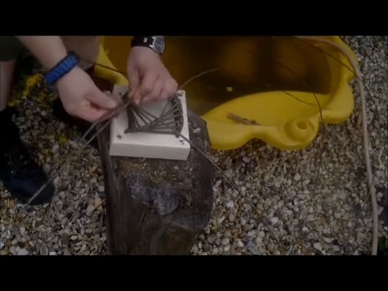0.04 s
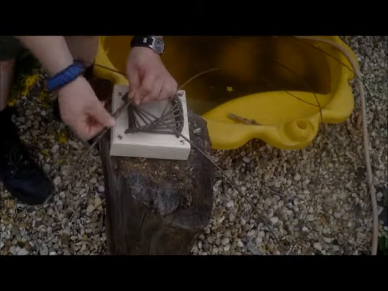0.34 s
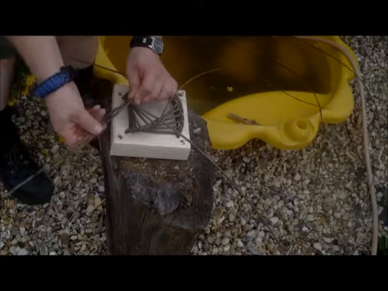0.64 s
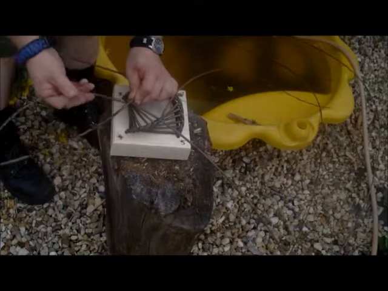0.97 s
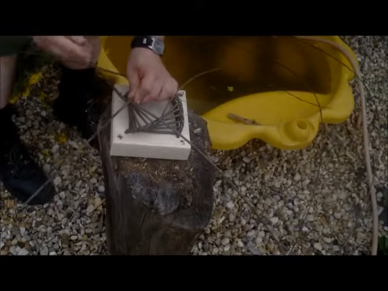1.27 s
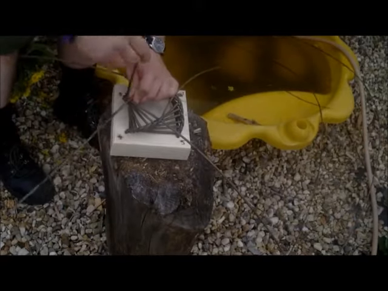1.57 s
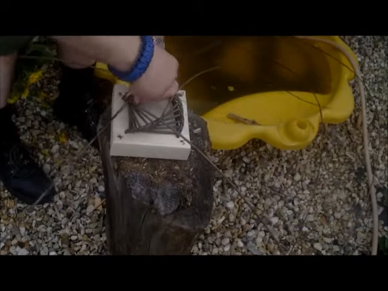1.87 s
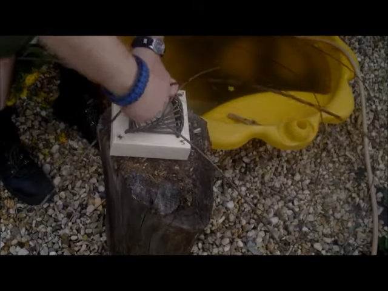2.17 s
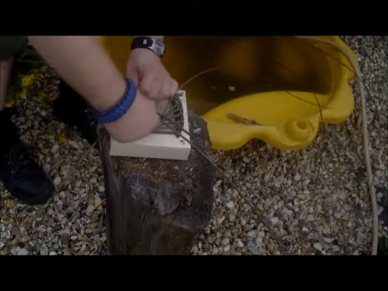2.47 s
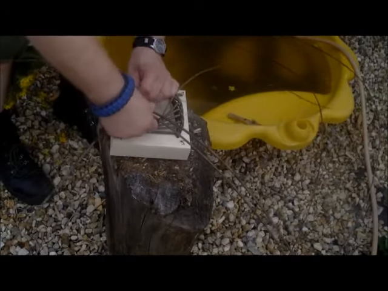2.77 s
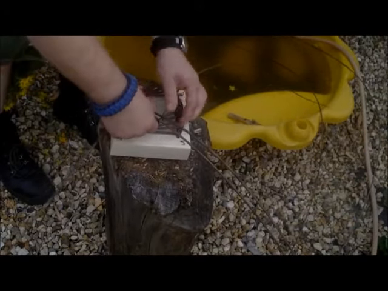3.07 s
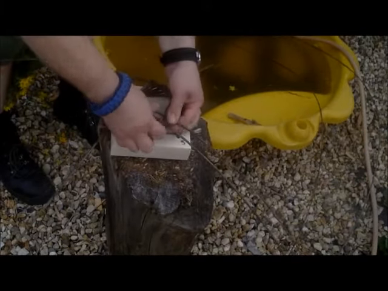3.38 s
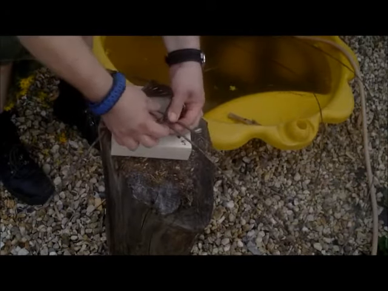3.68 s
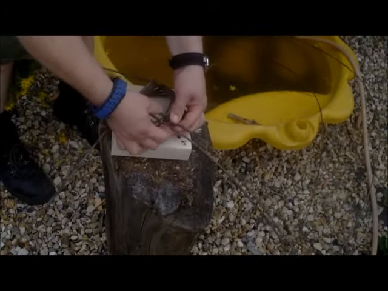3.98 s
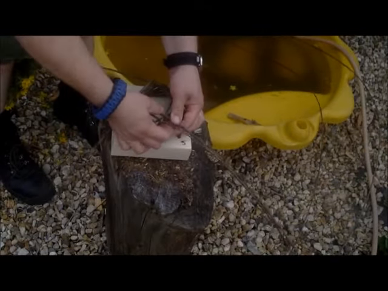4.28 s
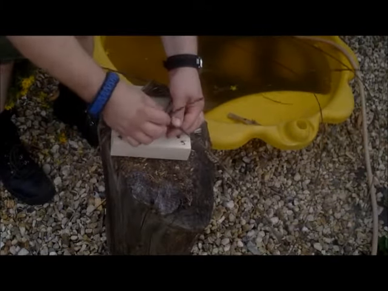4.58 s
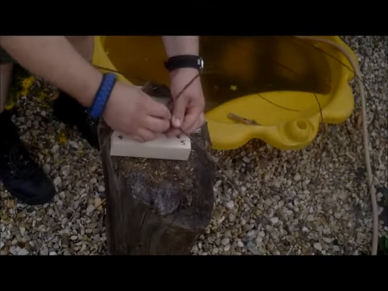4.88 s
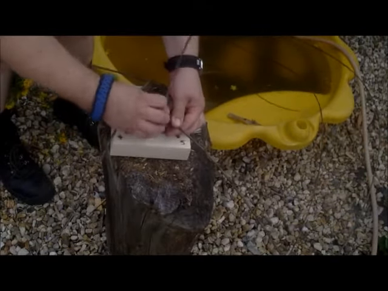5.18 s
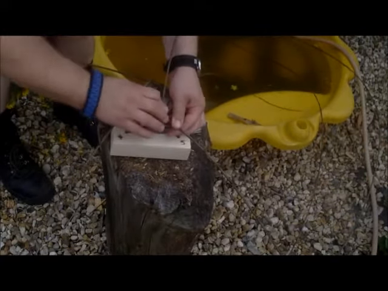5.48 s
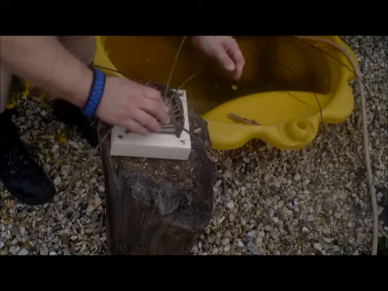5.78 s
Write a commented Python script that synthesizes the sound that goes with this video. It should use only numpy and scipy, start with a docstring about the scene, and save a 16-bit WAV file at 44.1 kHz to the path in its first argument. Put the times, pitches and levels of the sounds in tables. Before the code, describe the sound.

Soaked willow rods are woven outdoors, close by, their free ends whipping a hollow plastic tub. Each slap rings briefly, with a tight echo from a wall. A first slap lands at 0.2 seconds, then a busy run from 0.6 to 1.6 seconds, mixed with short, gritty scrapes along the rim. A quick burst of sharp rod-tip ticks peaks near 1.75 seconds. More slaps come between 2.5 and 3.1 seconds, followed by a lull. From 4.1 to 4.7 seconds there is a last flurry with a scrape and bright cracks, and one faint tick follows at 5.3 seconds. Throughout, a deep rumble swells and sinks under distant traffic and light hiss. Faint, thin road whines rise around 1.5 and 3.6 seconds, and a low engine drone wavers, strongest near 4.7 seconds.

```python
"""Outdoors, near a wall, soaked willow rods are woven on a wooden block. Their long free ends whip
against a plastic soaking tub, which rings, and the wall echoes each slap. The rods also drag along
the tub's rim, sticking and slipping. Their tips tick sharply, some at the start of a slap, some alone.
Behind them are a low rumble, a distant road with faint whines, and the drone of an engine."""
import sys
import numpy as np
from scipy import signal
from scipy.fft import rfft, irfft, next_fast_len
from scipy.io import wavfile
from scipy.ndimage import uniform_filter1d, map_coordinates

SR = 44100
rng = np.random.default_rng(int(sys.argv[2]) if len(sys.argv) > 2 else 0)


def bounce(signal):
    """Save signal as a 16-bit WAV file at the path given by the first command-line argument."""
    frames = np.transpose(np.atleast_2d(signal))
    limited = np.clip(frames, -1, 1)
    pcm = np.round(limited * 32767).astype(np.int16)
    wavfile.write(sys.argv[1], SR, pcm)


N = 266584

# Rod ends slapping the tub; the spot that is hit favours one note. Each row: start in seconds, level
# in dB, extra thud in dB, brightness in dB, note in Hz, the note's dB above the level.
TUB_SLAPS = [(0.218, -35, -3.5, 5, 3290, 0.5), (0.557, -49.5, -7, -12, 2300, -4),
             (0.673, -46, 9.5, 2, 410, 3), (0.785, -29.5, -1.5, 0, 2400, 3.5),
             (0.887, -36, 0.5, 2, 2336, 5.5), (0.9742, -41.5, 9, -2, 410, -7),
             (1.150, -29.5, 2.5, 6, 880, 1.5), (1.22, -40.5, -15, 12, 727, 11),
             (1.317, -38, -22, -7, 690, -4), (1.387, -45, -21, 4, 1300, -6), (1.616, -32, 3, 3.5, 370, 5.5),
             (1.886, -50, -15, -6, 2300, -10), (2.464, -29, 2.5, 8.5, 5020, -12),
             (2.6036, -28.5, 1, -1, 1255, 1.5), (2.738, -45.5, 7.5, -7, 1650, 3),
             (2.799, -33, 1, 5.5, 3386, -6), (2.953, -40, 3.5, -17, 1830, 5),
             (3.055, -38, -1, -6, 3420, -7), (4.102, -35, 4, -7, 160, 1), (4.189, -38.5, 1, -2, 222, 2),
             (4.4304, -30.5, 1, 16, 4900, -9), (4.449, -33, 0, 20, 3976, 9.5),
             (4.538, -26.5, 0.5, 7.5, 5890, -17), (4.6275, -32.5, -0.5, 1, 1295, 4)]


def amp(db):
    """Turn decibels into a gain; amp(-60 * t / ring_s) fades by 60 dB in ring_s seconds."""
    return 10 ** (np.asarray(db) / 20)


def unit(x):
    """Scale a signal to an average (rms) level of 1."""
    return x / np.sqrt(np.mean(x ** 2) + 1e-20)


def pan(lean_db):
    """Left and right gains that make the left louder by lean_db."""
    return amp([[lean_db / 2], [-lean_db / 2]])


def curves(rows):
    """Join timed points with straight lines: one curve for each column after the time."""
    times, *columns = np.transpose(rows)
    return [np.interp(np.arange(N) / SR, times, column) for column in columns]


def wobble(rate):
    """A smooth curve through `rate` random points a second."""
    points = rng.standard_normal(int(N * rate / SR) + 4)
    return map_coordinates(points, [np.arange(N) * rate / SR])


def filtered(x, response):
    """Multiply each frequency in x by response(hz)."""
    size = next_fast_len(N + SR // 2)
    return irfft(rfft(x, size) * response(np.fft.rfftfreq(size, 1 / SR)), size)[..., :N]


def stereo_noise(size, side_db):
    """White noise; the lower side_db is, the more alike left and right are."""
    mid, side = rng.standard_normal((2, size))
    return unit(mid + amp(side_db) * np.array([side, -side]))


def rush(spectrum, side_db, patchy_db=0):
    """Stereo noise shaped to a spectrum; patchy_db adds drifting louder and softer patches."""
    points_hz, db = np.transpose(spectrum)
    frames = signal.stft(stereo_noise(N, side_db), nperseg=2048)[2]
    patches = uniform_filter1d(rng.standard_normal(frames.shape[1:]), size=3, axis=0)
    patches = unit(uniform_filter1d(patches, size=12, axis=1))
    noise = signal.istft(frames * amp(patchy_db * patches), nperseg=2048)[1][:, :N]
    return unit(filtered(noise, lambda hz: amp(np.interp(np.log(hz + 1), np.log(points_hz), db))))


def split_bands(x):
    """Split a sound into thud, clack, snap and fizz; the thud leans left, the rest slightly right."""
    # The four bands. Each row: lower edge in Hz, upper edge in Hz.
    edges = [(200, 620), (620, 2900), (2900, 6900), (8500, 14800)]
    # Each band's left level minus its right level, in dB.
    leans = [14, -1.5, -1, -.3]
    filters = [signal.butter(3, band, "bandpass", fs=SR, output="sos") for band in edges]
    return [signal.sosfilt(sos, x) * pan(lean) for sos, lean in zip(filters, leans)]


def colour(thud_db, bright_db):
    """Extra dB for each band: a heavy contact adds thud, a hard one snap and fizz."""
    return np.array([thud_db, 0, 0.51 * bright_db, bright_db])


def mix_bands(bands, levels_db, size):
    """Mix bands so that the first `size` samples of each have the given level."""
    return sum(amp(db) * band / np.sqrt(np.mean(band[:, :size] ** 2) + 1e-20)
               for band, db in zip(bands, levels_db))


def ringing(modes, t, scatter_db, spread):
    """A struck object's fading tones (modes): random in strength, a bit out of step left and right."""
    hz, db, ring_s = np.transpose(modes)[:, :, None]
    strength, phase, skew = rng.standard_normal((3, len(modes), 1))
    stereo_shift = spread * skew * np.array([1, -1])[:, None, None]
    waves = np.sin(2 * np.pi * (hz * t + phase) + stereo_shift)
    return np.sum(amp(db + scatter_db * strength - 60 * t / ring_s) * waves, axis=1)


def add(track, start_s, sound):
    """Lay a sound into a track at start_s seconds."""
    start = max(round(start_s * SR), 0)
    track[:, start:start + sound.shape[1]] += sound[:, :N - start]


def rumble():
    """A deep throb and low noise swell and sink together over a steady, dull murmur."""
    # The tone of the low noise and of the murmur. Each row: frequency in Hz, relative level in dB.
    low_spectrum = [(12, -3.5), (20, -8), (26, 4.5), (38, -11.5), (55, -6.5), (80, -23), (160, -34.5),
                    (300, -80)]
    murmur_spectrum = [(20, -18.5), (45, 2), (75, -4.5), (110, -13), (150, -14), (215, -12), (300, -16.5),
                       (420, -22), (700, -32.5), (2000, -72)]
    # The swells. Each row: time in seconds, level in dB.
    swells = [(0, -26.5), (0.15, -29.5), (0.52, -23.5), (1.05, -28), (1.2, -25.5), (1.6, -32.5),
              (2.4, -44.5), (2.58, -29.5), (2.82, -27), (3.0, -43.5), (4.15, -44), (4.33, -31.5),
              (5.3, -42), (6.04, -36)]
    throb_hz = 24.2 * (1 + 0.0344 * wobble(4.6))
    throb = np.sin(2 * np.pi * np.cumsum(throb_hz) / SR)
    deep = amp(curves(swells)[0]) * (1.07 * throb + 0.66 * rush(low_spectrum, side_db=-20))
    murmur = amp(-40) * rush(murmur_spectrum, side_db=-12.5)
    return (deep + murmur) * pan(-1.4)


def road():
    """Distant traffic blends into a rush that slowly swells and sinks."""
    # The traffic's tone. Each row: frequency in Hz, relative level in dB.
    spectrum = [(110, -1.5), (180, -1), (317, -5.5), (353, 0.5), (444, -3), (487, -2), (534, -2.5),
                (783, -5), (1200, -4.5), (2840, -18.5), (5740, -26), (7000, -41), (9100, -78),
                (15400, -120)]
    # Its swells. Each row: time in seconds, level in dB.
    swells = [(0, -43), (0.55, -47.5), (1.1, -40.5), (2.2, -48), (4.25, -39), (5.4, -41), (6.04, -39)]
    gain = amp(curves(swells)[0] + 0.24 * wobble(7))
    return gain * rush(spectrum, side_db=-16.5, patchy_db=2.4) * pan(-1)


def whines():
    """Thin, wavering tones rise out of the traffic and fade again."""
    # Each row: start and end in seconds, first and last pitch in Hz, peak level in dB.
    glides = [(1.15, 1.867, 673, 646.5, -48), (1.28, 1.608, 610, 595, -46.5), (3.45, 3.71, 497, 492, -43.5),
              (3.58, 3.926, 810, 824, -47.5)]
    out = np.zeros((2, N))
    for start, end, from_hz, to_hz, db in glides:
        progress = np.linspace(0, 1, round((end - start) * SR))
        hz = (from_hz + (to_hz - from_hz) * progress) * (1 + 0.0045 * wobble(22)[:len(progress)])
        tone = amp(db) * np.sin(np.pi * progress) * np.sin(2 * np.pi * np.cumsum(hz) / SR)
        add(out, start, tone[None])
    return out


def engine():
    """An engine drones on two low notes, each wavering in pitch and loudness."""
    # How loud each note is. Each row: time in seconds, level in dB.
    upper_levels = [(0, -55), (0.3, -41), (2.0, -38.5), (2.75, -34.5), (3.3, -38.5), (3.7, -34.5),
                    (4.6, -42.5), (4.9, -44), (6.04, -45)]
    lower_levels = [(0, -48), (1.1, -38.5), (1.9, -67), (3.5, -59), (4.1, -33.5), (4.4, -35.5),
                    (4.72, -24.5), (5.3, -47), (6.04, -44)]
    # Their pitches. Each row: time in seconds, upper note in Hz, lower note in Hz.
    pitches = [(0, 112, 78), (2.5, 107, 76.46), (4.3, 104, 74.3), (4.601, 105, 77.1), (5.0, 110, 72.1),
               (6.04, 116, 71.6)]
    drone = 0
    for db, hz in zip(curves(upper_levels) + curves(lower_levels), curves(pitches)):
        cycles = np.cumsum(hz * (1 + 0.0088 * wobble(9))) / SR
        drone += amp(db + 1.3 * wobble(8)) * np.sin(2 * np.pi * cycles)
    return drone * pan(-1.4)


def rim_drags():
    """Wet bark sticks and slips along the tub's rim; the tiny, uneven jerks make the rim ring."""
    # Strokes of a rod. Each row: peak time, rise and fall in seconds, then level, extra thud and
    # brightness in dB.
    strokes = [(0.736, 0.046, 0.079, -41, 0.5, 4), (0.93, .02, 0.15, -36, -1, -1),
               (0.996, .015, 0.083, -43, -4, 16), (1.108, 0.038, 0.087, -37.5, 10.5, -3),
               (1.16, 0.06, 0.083, -26, -4.5, 3), (1.315, .01, 0.087, -40.5, -16, 14.5),
               (4.318, .015, 0.095, -45, -14, 14.5), (4.368, .07, 0.059, -36, -5.5, -4)]
    # The rim's resonances. Each row: frequency in Hz, width in Hz, relative level in dB.
    resonances = [(407, 15.4, 13.5), (698, 63, -4), (830, 60, -15), (1060, 25, -5), (1378, 54, -5.5),
                  (1965, 57, -6), (2255, 67, -6.5), (2460, 70, -12), (3210, 310, -11.5), (4300, 170, -9.5),
                  (5050, 350, -14), (6330, 400, -21)]
    # Thud, clack, snap and fizz of an ordinary stroke, in relative dB.
    balance_db = [1, -1, -9.5, -19]

    def rim(f):
        """How strongly the rim answers at each frequency."""
        return 0.018 + sum((-1) ** k * amp(db) * 1j * f * width / (hz * hz - f * f + 1j * f * width)
                           for k, (hz, width, db) in enumerate(resonances))

    slips_per_s, slip_s, fade_db = 750, 0.00074, 20
    out, t = np.zeros((2, N)), np.arange(N) / SR
    slips = (rng.random(N) < slips_per_s / SR) * amp(2.5 * rng.standard_normal(N))
    grains = unit(signal.lfilter([1], [1, -np.exp(-1 / (slip_s * SR))], slips))
    scrape = filtered(stereo_noise(N, side_db=-11) * (grains + .5), rim)
    bands = [unit(band) for band in split_bands(scrape)]
    for peak, rise, fall, db, thud_db, bright_db in strokes:
        pressure = amp(db - fade_db * np.maximum((peak - t) / rise, (t - peak) / fall))
        out += pressure * np.tensordot(amp(colour(thud_db, bright_db) + balance_db), bands, 1)
    return out


def rod_ticks():
    """Sharp rod-tip ticks: some start a slap on the tub, others tap alone close by."""
    # A harder contact has a higher pitch. Each row: start in seconds, level in dB, pitch in Hz, base
    # fade time in seconds.
    contacts = [(0.218, -32.5, 6100, 0.015), (0.7878, -28, 1910, .016), (0.886, -30.5, 1640, .016),
                (1.1495, -35, 3560, 0.0083), (1.318, -32.5, 9800, 0.011), (1.390, -40.5, 4500, .019),
                (1.612, -23, 6240, .01), (1.668, -44, 6900, .006), (1.695, -40, 2360, .012),
                (1.701, -28.5, 1500, 0.031), (1.7375, -30, 4930, 0.0055), (1.751, -24.5, 2340, 0.012),
                (1.7686, -19.5, 2190, .014), (1.7724, -26, 1360, 0.014), (2.136, -46, 2180, 0.029),
                (2.4447, -42, 1170, 0.04), (2.601, -32, 1330, 0.018), (3.954, -44.5, 4660, 0.012),
                (4.318, -46, 9600, .012), (5.260, -50, 6850, .022)]
    # A thin rod's modes. Each row: frequency in Hz, relative level in dB, multiple of the fade time.
    rod_modes = [(1450, -8, 1), (2020, 0, 1.6), (2490, -1.5, 3.3), (4020, 3.5, 1.7), (5030, 11, 0.4),
                 (5960, 4, 0.82), (6900, -22, 0.59), (10740, 3, 0.47), (11800, 5, 0.45)]
    out, t = np.zeros((2, N)), np.arange(SR // 10) / SR
    centres_hz = np.array([1500, 4500, 11200])  # clack, snap and fizz; a tick has no thud
    note_db, octave_loss_db = 5, 3.5
    for start, db, hz, fade_s in contacts:
        modes = [(f, level, times * fade_s) for f, level, times in rod_modes + [(hz, note_db, 1.4)]]
        spike = amp(-60 * t / (.5 * fade_s))
        tail = amp(-17.5 - 60 * t / 0.12)
        noise = stereo_noise(len(t), side_db=-5) * (spike + tail)
        tick = noise + .3 * ringing(modes, t, scatter_db=1, spread=.25)
        levels_db = db - octave_loss_db * np.log2(centres_hz / hz) ** 2  # strongest near its pitch
        add(out, start, mix_bands(split_bands(tick)[1:], levels_db, size=128))
    return out


def tub_notes():
    """Each slap leaves one note ringing, high ones longest; the rod touching the tub makes it flutter."""
    out, t = np.zeros((2, N)), np.arange(SR // 2) / SR
    attack = 1 - np.exp(-t / 0.00081)
    for start, db, _, _, hz, note_db in TUB_SLAPS:
        ring_s = .1 + .012 * (hz / 1000) ** 2
        flutter = np.interp(t, np.linspace(0, .5, 120), rng.normal(1, .25, size=120))
        note = ringing([(hz, db + note_db, ring_s)], t, scatter_db=1, spread=0.15)
        lean_db = np.interp(hz, [230, 380, 700], [6, 13.5, -3])
        add(out, start, note * flutter * attack * pan(lean_db))
    return out


def tub_slaps():
    """A rod cracks on the tub, chatters and sets it ringing; the wall sends back a smeared crack."""
    # The hollow tub's modes. Each row: frequency in Hz, relative level in dB, seconds to fade by 60 dB.
    tub_modes = [(161.7, -4, 0.33), (230, 0, 0.28), (370.4, 1.5, 0.27), (413.8, 5, 0.21), (681, -15, .17),
                 (844, -6, 0.064), (1242, 0.5, 0.1), (1313, 8, 0.03), (1654, 1.5, 0.062),
                 (1836, -8.5, 0.17), (1980, -15, 0.11), (2190, -1.5, 0.047), (2290, -9.5, 0.35),
                 (2424, 2, 0.067), (2640, -13, 0.32), (3246, -6, 0.29), (3720, -1.5, 0.26), (3790, -5, 0.2),
                 (3940, -3.5, 0.34), (4490, 2, 0.18), (4750, 0, 0.19), (4800, -0.5, 0.25), (5000, -5, 0.44),
                 (5560, -15, 0.31), (5867, -6.5, 0.28), (6200, -23, 0.16), (6950, -33, 0.23)]
    # Thud, clack, snap and fizz of an ordinary slap, in relative dB.
    balance_db = [-2, -0.5, -8, -26.5]
    crack_s, echo_delay_s, echo_smear_s = 0.033, 0.023, 0.026
    rebound_hz, rebound_db = 239, 2
    minor_db, minor_ring_s = -8, 0.19
    out, t = np.zeros((2, N)), np.arange(SR // 4) / SR
    attack = 1 - np.exp(-t / .002)
    crack = amp(-60 * t / crack_s)
    echo = 0.41 * amp(-60 * np.abs(t - echo_delay_s) / echo_smear_s)
    for start, db, thud_db, bright_db, _, _ in TUB_SLAPS:
        chatter_s = 0.33 * 2 ** ((db + 35.5) / 31)  # harder slaps chatter longer
        rebounds = np.interp(t * rebound_hz, np.arange(200), rng.standard_normal(200))
        chatter = .22 * amp(rebound_db * rebounds - 60 * t / chatter_s)
        noise = stereo_noise(len(t), side_db=-13) * np.sqrt(crack ** 2 + echo ** 2 + chatter ** 2)
        # every blow also wakes its own handful of minor modes
        minor_modes = [(hz, minor_db, minor_ring_s) for hz in rng.uniform(500, 14000, size=26)]
        shell = .16 * ringing(tub_modes + minor_modes, t, scatter_db=3, spread=.4)
        bands = split_bands((noise + shell) * attack)
        levels_db = db + colour(thud_db, bright_db) + balance_db
        add(out, start - .0012, mix_bands(bands, levels_db, size=1024))
    return out


def scene():
    """The weaving over the outdoor background."""
    weaving = tub_slaps() + tub_notes() + rod_ticks() + rim_drags()
    return weaving + rumble() + road() + engine() + whines()


def record(dry):
    """The camera adds hiss and a faint whine, dips a narrow band of treble and cuts off the very top."""
    # The tone of the hiss. Each row: frequency in Hz, relative level in dB.
    hiss_spectrum = [(500, 5.5), (3000, 9), (6000, 4), (9000, 0), (12000, 4.5), (16000, -0.5)]
    notch_hz, notch_width_hz, top_hz = 7800, 800, 15850
    hiss = amp(-54.5) * rush(hiss_spectrum, side_db=-2)
    whine = amp(-79) * np.sin(2 * np.pi * 11900 * np.arange(N) / SR)
    notch = lambda f: (notch_hz ** 2 - f * f) / (notch_hz ** 2 - f * f + 1j * f * notch_width_hz)
    notched = filtered(dry + hiss + whine, lambda f: notch(f) ** 2)
    return filtered(notched, lambda f: f < top_hz)


dry = scene()
out = record(dry)
bounce(out)
```